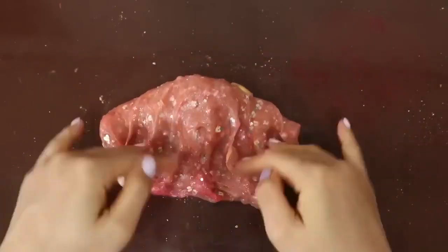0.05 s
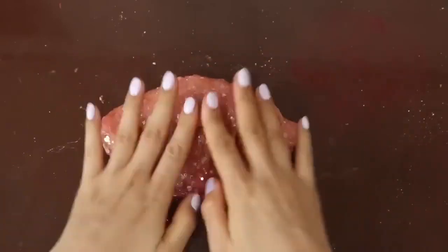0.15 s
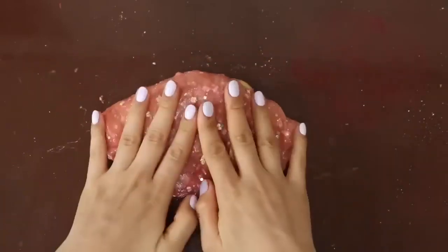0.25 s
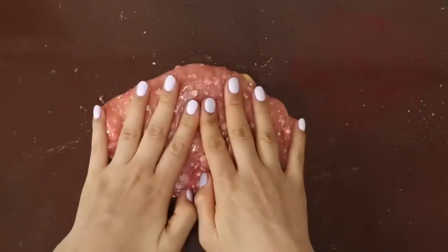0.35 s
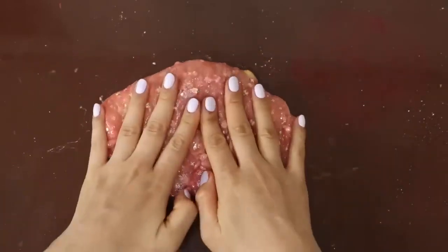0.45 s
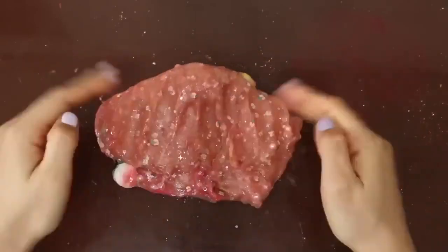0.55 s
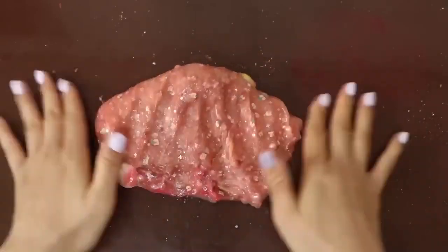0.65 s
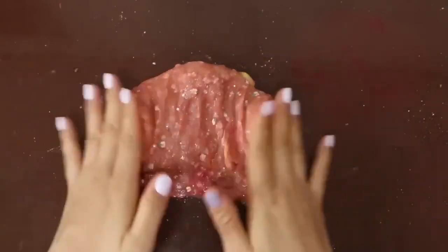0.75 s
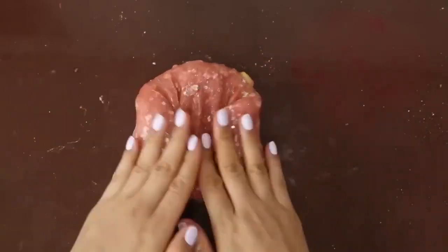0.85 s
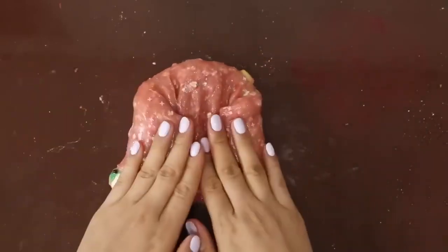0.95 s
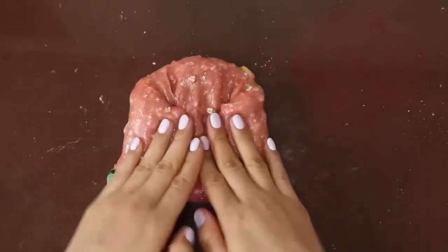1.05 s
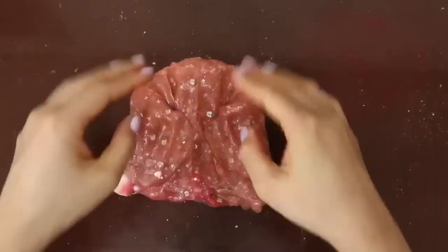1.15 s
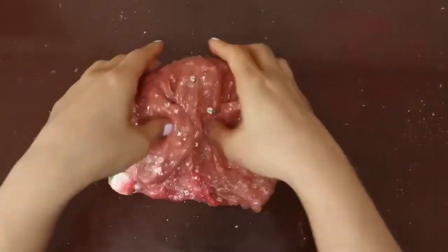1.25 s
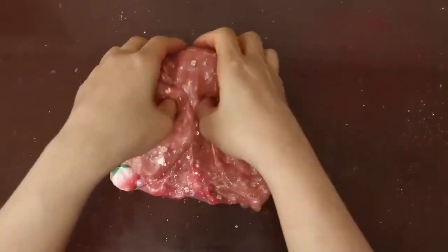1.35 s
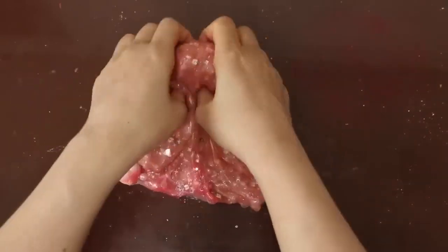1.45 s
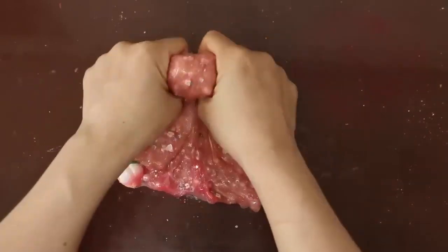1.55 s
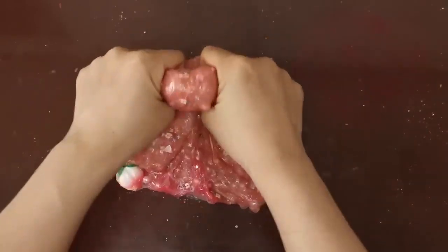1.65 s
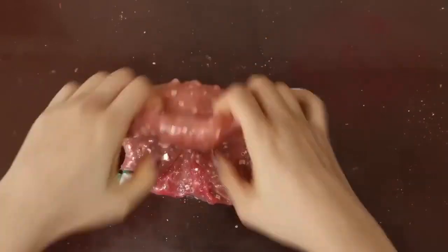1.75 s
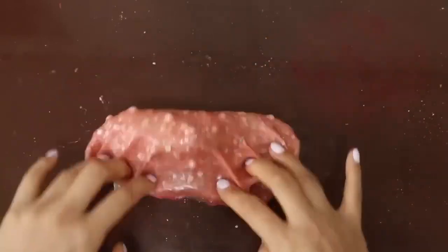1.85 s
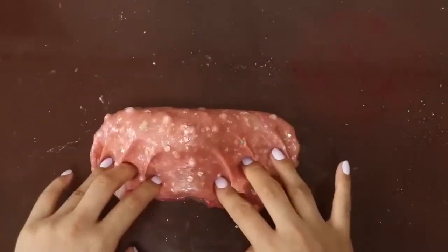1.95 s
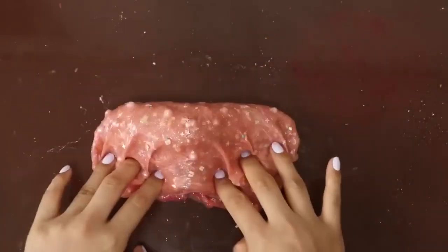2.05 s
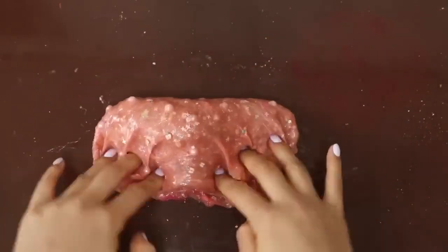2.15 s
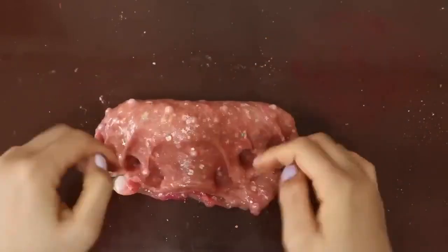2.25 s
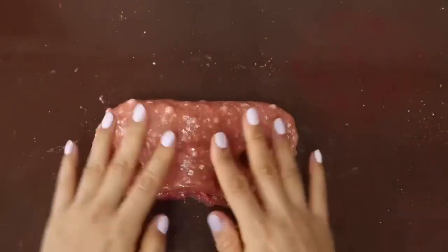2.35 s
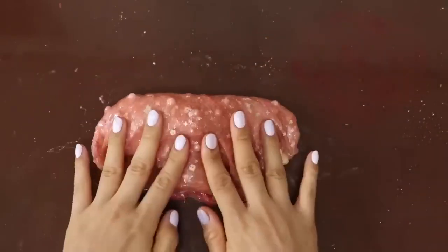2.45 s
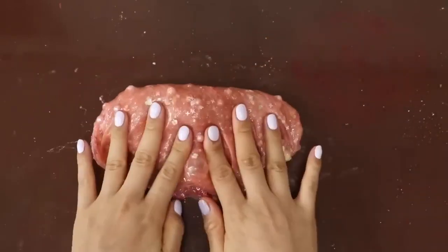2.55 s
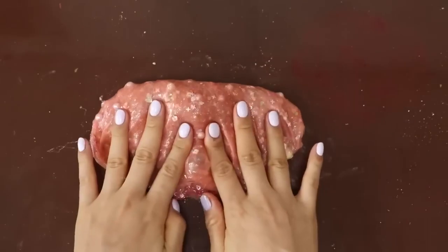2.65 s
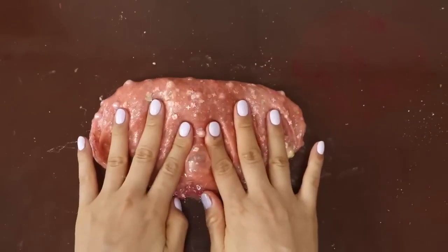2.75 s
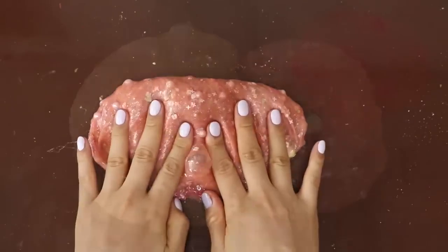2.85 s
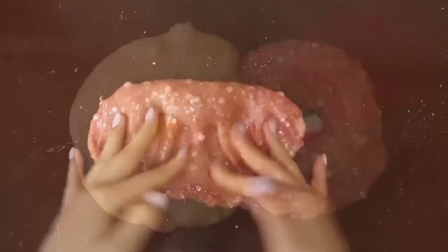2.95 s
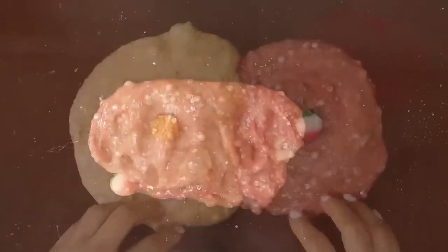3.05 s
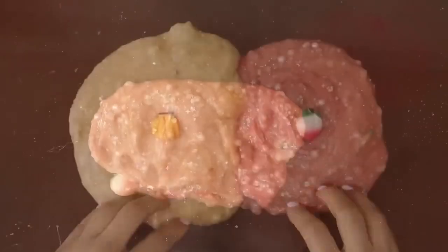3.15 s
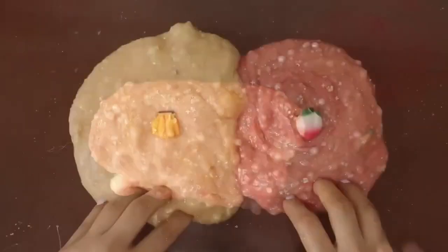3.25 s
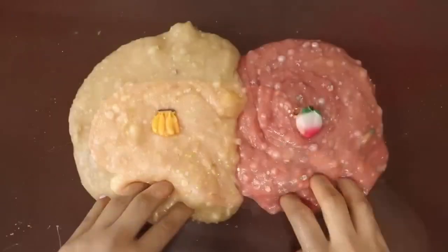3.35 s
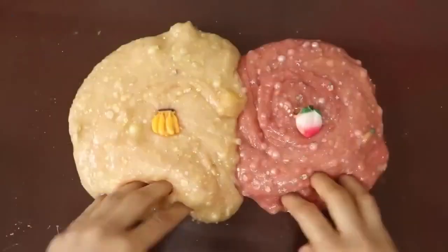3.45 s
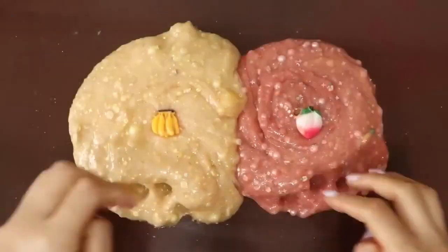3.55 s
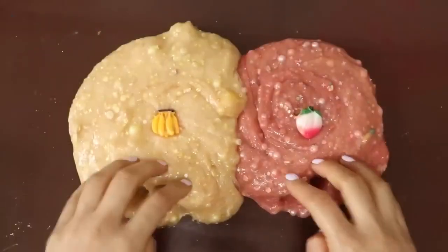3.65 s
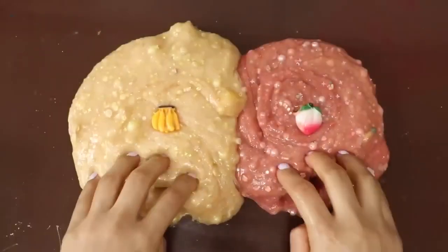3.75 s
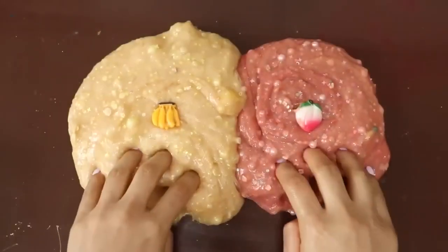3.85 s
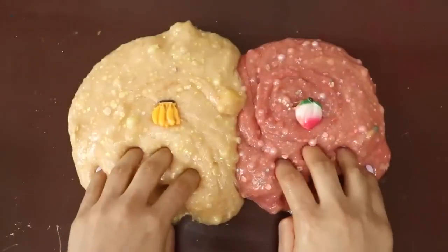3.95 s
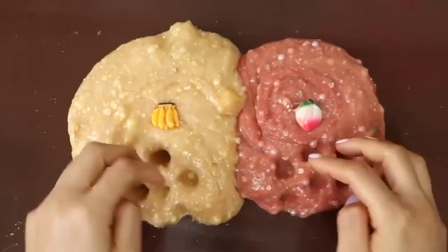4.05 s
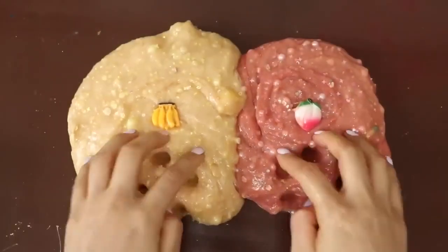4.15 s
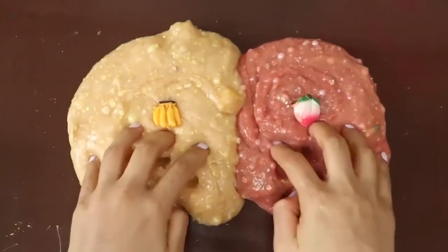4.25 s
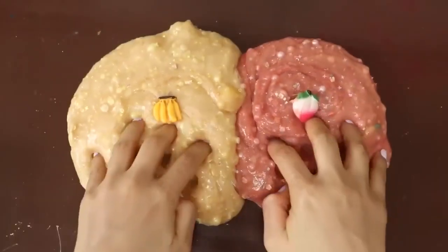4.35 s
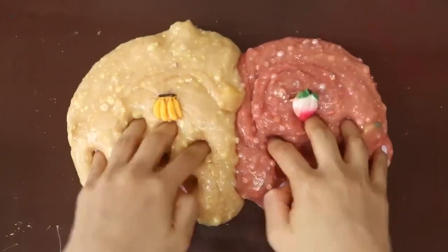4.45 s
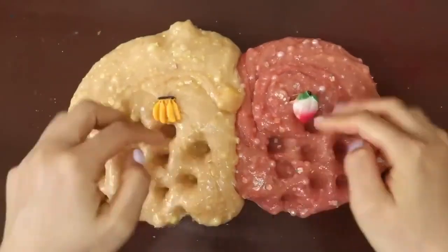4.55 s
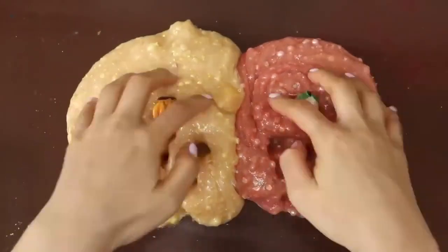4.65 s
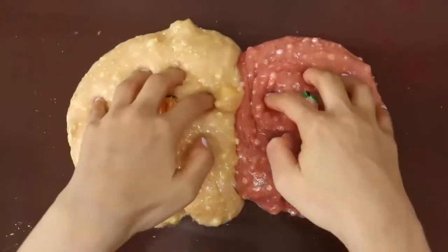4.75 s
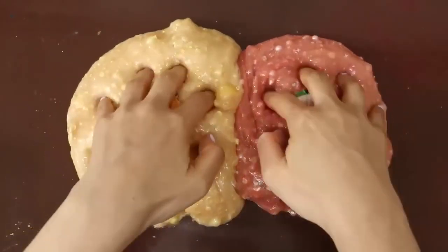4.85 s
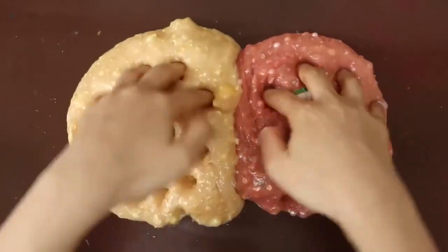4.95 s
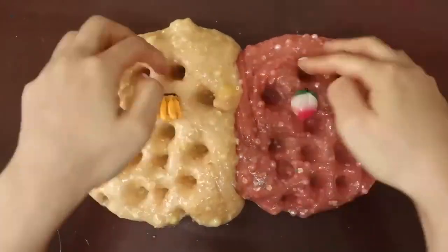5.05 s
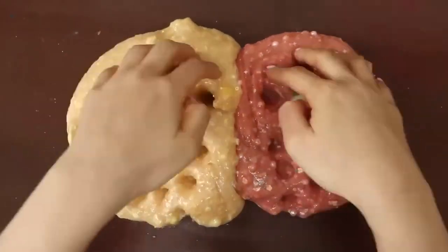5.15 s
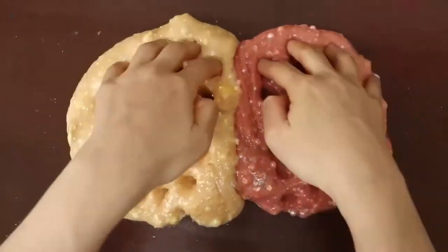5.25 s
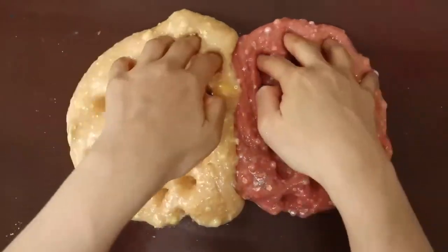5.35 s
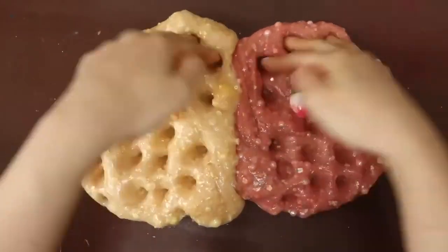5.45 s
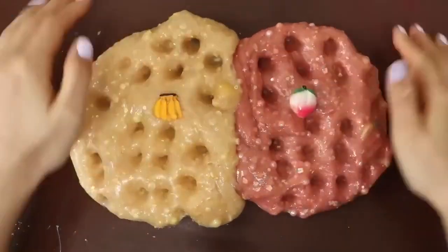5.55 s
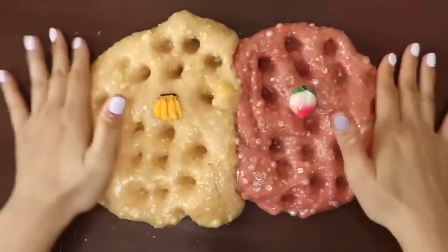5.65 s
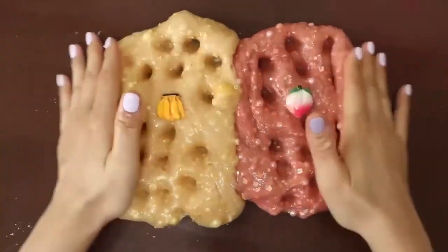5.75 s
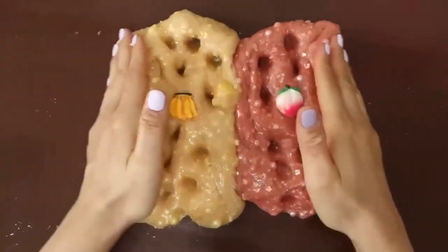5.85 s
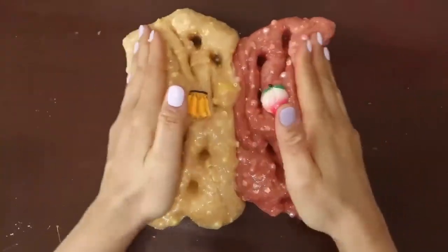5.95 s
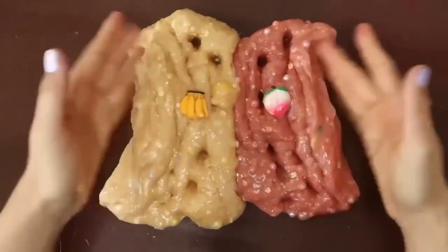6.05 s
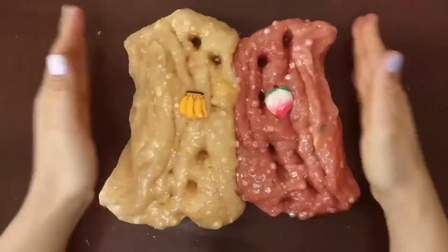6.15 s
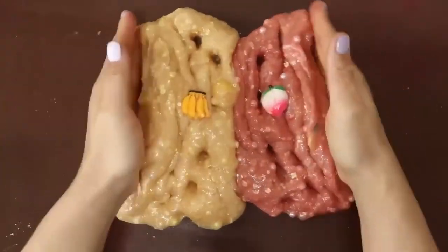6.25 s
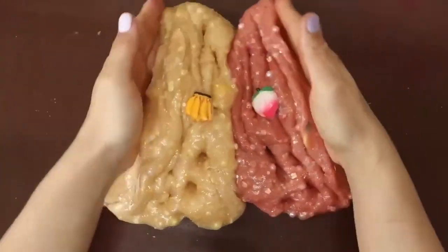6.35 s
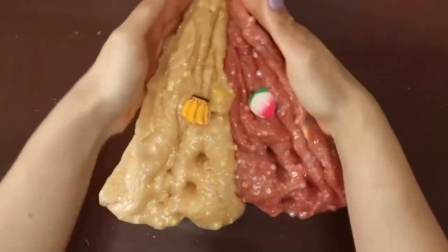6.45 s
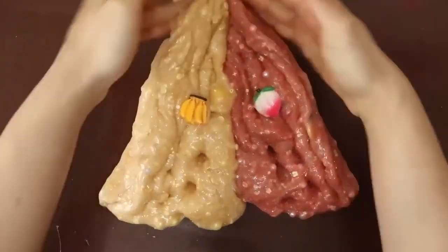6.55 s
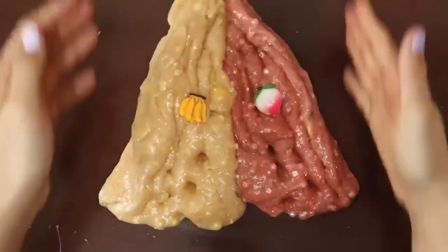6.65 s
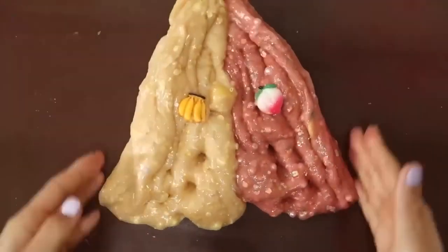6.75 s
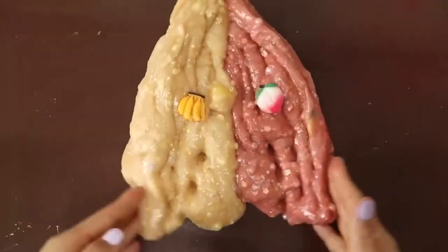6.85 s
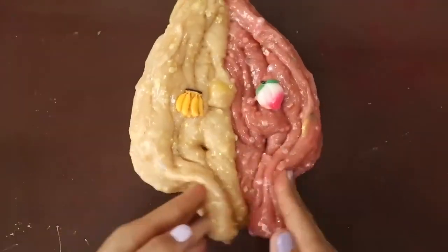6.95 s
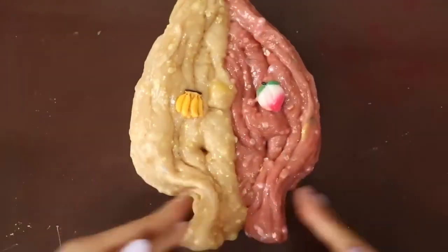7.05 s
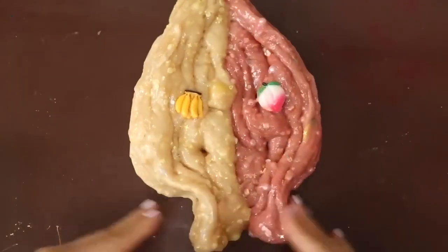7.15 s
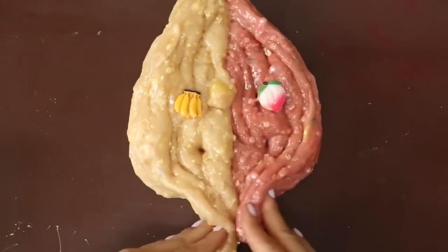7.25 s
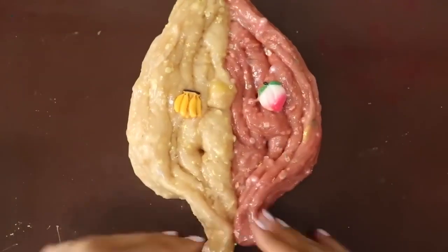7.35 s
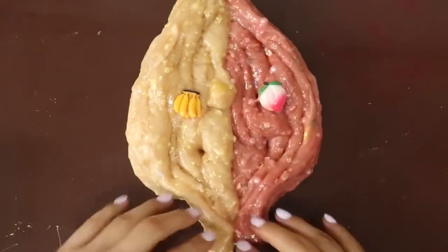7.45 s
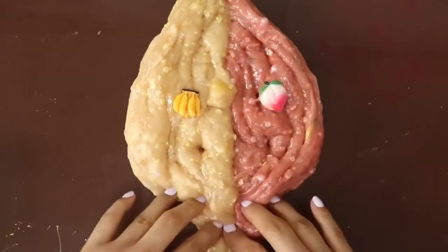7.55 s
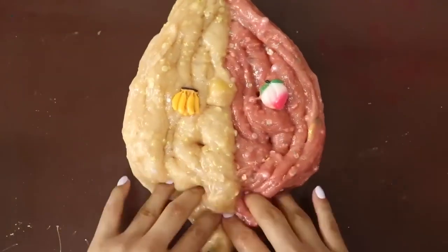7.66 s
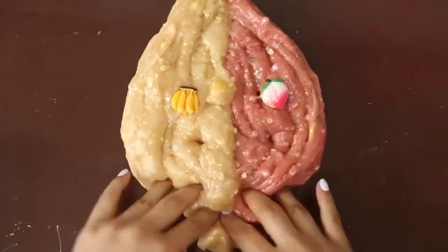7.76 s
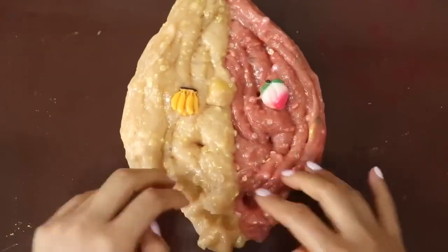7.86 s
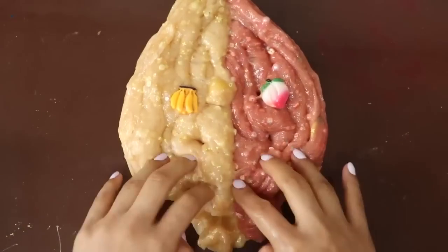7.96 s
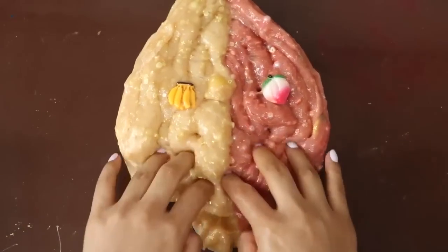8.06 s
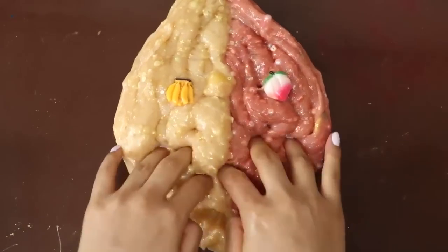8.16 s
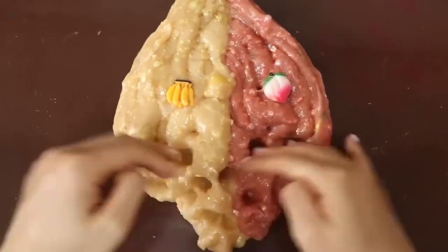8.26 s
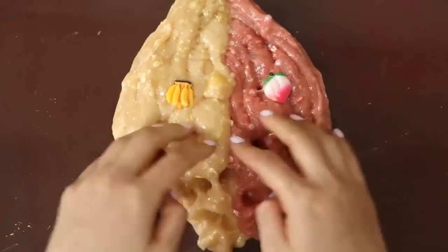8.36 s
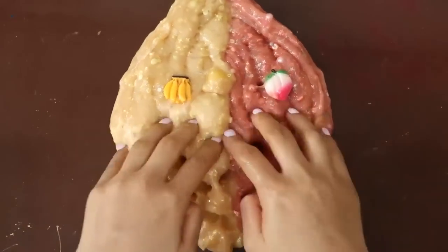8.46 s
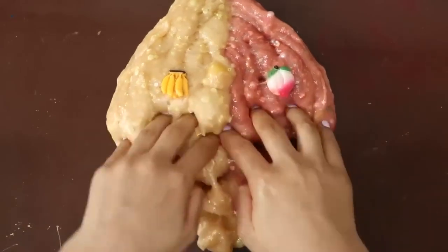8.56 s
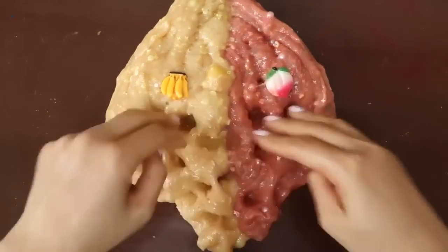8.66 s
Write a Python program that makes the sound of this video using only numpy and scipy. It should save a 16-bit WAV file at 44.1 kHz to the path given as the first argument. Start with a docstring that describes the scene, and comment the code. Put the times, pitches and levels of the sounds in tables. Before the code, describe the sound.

A quiet indoor room with a soft low hush and faint hum; a close stereo microphone hears hands working sticky slime on a wooden table. From 0 to 1.3 seconds, gentle wet presses with small dry snaps and a few pops. Between 1.4 and 1.8, stretching gives a cluster of bright cracks, two very loud near 1.65, then a sticky peel. From 2 to 3 it is calmer, with a soft squish at 2.3. Presses at 3.05 and 3.6 bring hollow pops. Strong pokes at about 4.1, 4.6, 5.1 and 5.5 make gulping squelches, loud crackling bubble bursts and low table booms with a slight sway. From 5.8 to 6.9, squeezing and stretching scatter crisp snaps, with thuds at 6.2 and 6.65. Quieter sticky handling follows, with wet presses at 7.9 and a juicier popping one at 8.3, then small ticks.

```python
"""On a light wooden table in a quiet room, hands knead and poke sticky slime close to a stereo microphone.
Air pockets burst with a crack of noise and a short hollow ring; sticky film snaps with dry cracks.
Peeling is hiss and random ticks, squelching is gulps that ring in small pockets, sliding fingers are soft noise.
Pushes make the table top boom, and it sways on its legs when the hands let go."""
import sys
import numpy as np
from scipy import signal
from scipy.io import wavfile

SR = 44100
rng = np.random.default_rng(int(sys.argv[2]) if len(sys.argv) > 2 else 0)


def level_to_linear(level):
    """Convert decibel levels to linear amplitude factors, elementwise."""
    exponent = np.asarray(level, float) / 20
    return 10 ** exponent


def transcribe(u):
    """Save the signal u as a 16-bit wav file named by the first command-line argument.

    u: samples, shape (n,) or (channels, n), limited to [-1, 1]; the rate is SR.
    q: integer samples, one column per channel.
    """
    v = np.clip(np.atleast_2d(u).T, -1, 1)
    q = np.round(v * 32767).astype(np.int16)
    wavfile.write(sys.argv[1], SR, q)


N = 384552   # length in samples


def rms_one(x):
    """Scales a sound to an rms of 1."""
    return x / np.sqrt(np.mean(x ** 2) + 1e-20)


def at_hz(points, hz):
    """Reads a curve of (pitch, value) points, with pitch on a logarithmic scale."""
    points_hz, values = np.array(points).T
    return np.interp(np.log(hz), np.log(points_hz), values)


def band(x, low_hz, high_hz, order=2):
    """Keeps the sound between two pitches."""
    edges_hz = [low_hz, min(high_hz, SR / 2.2)]
    return signal.sosfilt(signal.butter(order, edges_hz, "band", fs=SR, output="sos"), x)


def drift(rate):
    """Slow chance: random points of spread 1, so many a second, joined by straight lines."""
    knots = rng.standard_normal(int(N / SR * rate) + 2)
    return np.interp(np.arange(N) * rate / SR, np.arange(len(knots)), knots)


def ring(x, hz, t60):
    """A resonance: a unit click sets a sine of height 1 ringing, which falls 60 dB in t60 seconds."""
    radius = level_to_linear(-60 / (t60 * SR))
    turn = 2 * np.pi * hz / SR
    return signal.lfilter([0, np.sin(turn)], [1, -2 * radius * np.cos(turn), radius ** 2], x + 1e-18)


# how alike the two ears hear a sound: (frequency [Hz], left-right likeness [1 = the same, 0 = unrelated])
EAR_LIKENESS = [(60, 0.14), (300, 0.14), (700, 0.27), (3000, 1), (8000, 0.14)]


def spread(source, spectrum, lowest_hz):
    """Two unrelated signals become left and right, half an octave at a time, coloured by the spectrum; rms 1."""
    edges = lowest_hz * 2 ** np.arange(0, np.log2(18000 / lowest_hz), 0.5)
    out = 0
    for k, (low, high) in enumerate(zip(edges, edges[1:])):
        mid, side = band(source, low, high) * (-1) ** k   # every other band is turned upside down
        hz = np.sqrt(low * high)
        alike = np.clip(at_hz(EAR_LIKENESS, hz), -1, 1)
        ears = np.sqrt(1 + alike) * mid + np.sqrt(1 - alike) * side * [[1], [-1]]
        out = out + level_to_linear(at_hz(spectrum, hz)) * ears
    return rms_one(out)


def grains(per_s, spread_db, clump_db):
    """Clicks of sticky threads that snap at random, in clumps, with a long tail of sizes."""
    born = rng.random(N) < per_s * level_to_linear(clump_db * drift(60)) / SR
    size = level_to_linear(spread_db * np.minimum(rng.exponential(1, N), 4))
    return born * size * rng.choice([-1, 1], N)


def add(out, sound, s):
    """Places a short sound at a time, a little to one side or the other by chance."""
    i = round(s * SR)
    balance_db = np.array([[0.5], [-0.5]]) * rng.normal(1, 1.7)
    out[:, i:i + sound.shape[1]] += (sound * level_to_linear(balance_db))[:, :N - i]


def crack(noise, db, hz, tear_ms, width=1.5, body_db=-8, apart=0.32, body_apart=0.23, fizz_db=-26, fizz_s=0.0072):
    """Noise while the skin tears: it swells to a peak after tear_ms, closes more slowly and fizzes out."""
    t = np.arange(noise.shape[1]) / SR
    late = 1000 * t / tear_ms - 1   # from the peak, in tear times
    burst = np.exp(-np.where(late < 0, 2 * late, late / 2) ** 2)
    tearing = burst + level_to_linear(fizz_db) * np.exp(-t / fizz_s)
    mid = noise[0] * tearing
    side = noise[1] * tearing * [[1], [-1]]
    half_width = 2 ** (width / 2)   # width is in octaves
    out = band(mid + apart * side, hz / half_width, hz * half_width, order=1)
    out = out + level_to_linear(body_db) * band(mid + body_apart * side, 590, 16000, order=1)
    return out * level_to_linear(db) / np.abs(out.mean(axis=0)).max()


# colour of the quiet room and the microphone's own noise: (frequency [Hz], relative level [dB per Hz])
HUSH_COLOUR = [(15, -30), (25, 4.5), (50, 4.5), (134, -2), (293, -10.5), (344, -14), (394, -22), (516, -19),
               (863, -25), (3340, -35), (7710, -39), (10700, -40.5), (16000, -40.5)]
# faint wavering tones in the room: (frequency [Hz], rms level [dB])
HUM_TONES = [(346, -71.5), (517, -72.5)]


def hush(rms_db=-50.5):
    """Steady coloured noise, with two faint tones made by narrow resonances in noise."""
    out = level_to_linear(rms_db) * spread(rng.standard_normal((2, N)), HUSH_COLOUR, 22)
    for hz, db in HUM_TONES:
        out = out + level_to_linear(db) * rms_one(ring(rng.standard_normal((2, N)), hz, 0.33))
    return out


def room(x, t60_s=0.16, tail_db=-15):
    """Echoes from all around: a short tail of fading noise, unrelated in the two ears."""
    t = np.arange(SR // 4) / SR
    tail = rng.standard_normal((2, len(t))) * level_to_linear(-60 * t / t60_s) * (1 - np.exp(-t / 0.0015))
    tail = tail / np.sqrt(np.sum(tail[0] ** 2))
    return level_to_linear(tail_db) * signal.fftconvolve(x, tail, axes=1)[:, :N]


# the table let go: (time [s], slow sway level [dB], quick sway level [dB])
RELEASES = [(0.16, -32.5, -53), (0.285, -40, -32.5), (0.61, -34.5, -33.5), (0.759, -47.5, -37),
            (0.858, -44.5, -39.5), (1.222, -35, -40), (1.827, -25, -32.5), (2.305, -32.5, -44),
            (3.049, -32, -47), (3.594, -35, -44), (4.137, -26.5, -32.5), (4.635, -22, -38),
            (5.112, -22.5, -31.5), (5.577, -24.5, -32.5), (5.738, -43, -33), (6.197, -23.5, -25),
            (6.662, -22, -30), (7.178, -29.5, -71), (7.445, -29.5, -41), (7.898, -23.5, -30.5),
            (7.997, -56, -36.5), (8.347, -31, -28.5)]
# the slow and the quick sway on the legs:
# (usual frequency [Hz], time to fall 60 dB [s], part opposed in the ears, against the part alike [dB])
LEG_MODES = [(27.97, 0.63, -2.5), (52, 0.57, 0.5)]


def sway():
    """Each release is a soft shove that sets both leg modes swinging, a little off their pitch each time."""
    out = np.zeros((2, N))
    chance = rng.standard_normal((len(RELEASES), 2, 2))
    for (s, *levels_db), luck in zip(RELEASES, chance):
        i = round(s * SR)
        t = np.arange(min(SR, N - i)) / SR
        for (hz, t60, opposed_db), db, (off, lag) in zip(LEG_MODES, levels_db, luck):
            swing = level_to_linear(db - 60 * t / t60) * (1 - np.exp(-t / 0.009))
            turn = 2 * np.pi * hz * (1 + 0.063 * off) * t
            opposed = level_to_linear(opposed_db) * np.sin(turn + 2 * lag) * [[1], [-1]]
            out[:, i:i + len(t)] += swing * (np.sin(turn) + opposed)
    return out


# short presses and pull-offs; the levels are drives, before each sound's own trim:
# (time of full strength [s], rise [s], peeling hiss [dB], wet low squelch [dB], push on the table top [dB])
SHORT_PRESSES = [(0.116, 0.076, -45.5, -45, -53.5), (0.279, 0.014, -54, -55, -42),
                 (0.596, 0.041, -40, -39, -47), (0.751, 0.0063, -51, -60, -33.5),
                 (0.882, 0.03, -57.5, -53.5, -67), (1.187, 0.028, -44.5, -41, -50),
                 (1.832, 0.066, -36.5, -41.5, -51), (2.301, 0.045, -42, -39.5, -35.5),
                 (3.041, 0.036, -40.5, -39, -39.5), (3.584, 0.043, -38, -35, -38),
                 (4.122, 0.045, -32.5, -28.5, -33), (4.593, 0.017, -26.5, -26.5, -29.5),
                 (5.097, 0.053, -28, -28, -34), (5.352, 0.019, -65, -59.5, -47.5),
                 (5.537, 0.019, -29.5, -29.5, -31), (5.703, 0.026, -57, -56, -31.5),
                 (5.866, 0.039, -46.5, -50.5, -64), (6.146, 0.061, -37.5, -39.5, -39),
                 (6.64, 0.025, -34, -37, -39.5), (7.131, 0.027, -50.5, -45.5, -46.5),
                 (7.323, 0.015, -57.5, -51, -43.5), (7.423, 0.025, -52, -49, -42.5),
                 (7.883, 0.027, -36.5, -39, -35), (8.313, 0.0054, -32, -24, -28),
                 (8.711, 0.0195, -48.5, -45, -70)]
# slow stretching and squeezing, likewise: (time of full strength [s], rise [s], hold [s], peeling hiss [dB])
SLOW_STRETCHES = [(0.806, 0.08, 0.044, -47), (1.492, 0.23, 0.24, -50), (1.795, 0.059, .04, -36),
                  (1.875, 0.025, 0.079, -52), (3.106, 0.029, 0.08, -64.5), (5.307, 0.0724, 0.16, -67),
                  (5.791, 0.18, 0.1, -53), (5.947, 0.029, 0.12, -53.5), (6.305, 0.012, 0.046, -55.5),
                  (6.365, 0.023, 0.21, -47), (6.909, 0.035, 0.13, -50.5)]


def effort(fall_db_per_s=450, swell_db=28, press_hold_s=0.015):
    """Every press or stretch swells, holds and lets go; gives the gains of hiss, squelch and push."""
    kneads = [(s, rise, press_hold_s, *levels_db) for s, rise, *levels_db in SHORT_PRESSES]
    # in a stretch, squelch and push lie below the hiss
    kneads += [(s, rise, hold, db, db - 4, db - 6.5) for s, rise, hold, db in SLOW_STRETCHES]
    t = np.arange(0, N, 32) / SR
    power = 0
    for s, rise, hold, *levels_db in kneads:
        swell = np.minimum(swell_db * (t - s) / rise, 0)
        fall = fall_db_per_s * np.maximum(t - s - hold, 0)
        gains_db = np.add.outer(levels_db, swell - fall)
        power = power + level_to_linear(np.maximum(gains_db, -150)) ** 2
    return [np.interp(np.arange(N) / SR, t, np.sqrt(p)) for p in power]


# resonances of the table top:
# (frequency [Hz], relative level alike in both ears [dB], relative level opposed [dB], time to fall 60 dB [s])
TOP_MODES = [(101, -15.5, -5, 0.17), (141.7, -6, 5.5, 0.43), (200.5, 1.5, -11, 0.058), (244, -4, -8, 0.1),
             (273, -8, 0.5, 0.081)]


def table_top(gain):
    """Lumpy pushes drive the panel modes; some reach the two ears in opposition."""
    lumpy = gain * rng.standard_normal((2, N)) * level_to_linear(4.0 * drift(40))
    push = band(lumpy, 67, 280)   # flesh lands softly
    out = 0
    for hz, alike_db, opposed_db, t60 in TOP_MODES:
        mid, side = ring(push, hz, t60) / np.sqrt(t60 * SR)
        out = out + level_to_linear(alike_db) * mid + level_to_linear(opposed_db) * side * [[1], [-1]]
    return level_to_linear(12.0) * out


# fingers slide lightly: (start time [s], length [s], level before its flutter [dB])
FINGER_RUBS = [(1.92, 0.053, -57.5), (3.093, .1, -68.5), (3.705, 0.28, -69), (4.672, .33, -74),
               (7.473, 0.33, -69.5)]


def rubbing(centre_hz=2800, octaves=0.7, fade_s=0.03):
    """A soft band of friction noise that flutters, and fades in and out with each slide."""
    t = np.arange(N) / SR
    gain = 0
    for s, length, db in FINGER_RUBS:
        gain = gain + level_to_linear(db) * np.clip(np.minimum(t - s, s + length - t) / fade_s + 0.5, 0, 1)
    half_width = 2 ** (octaves / 2)
    mid, side = band(rng.standard_normal((2, N)), centre_hz / half_width, centre_hz * half_width)
    return gain * level_to_linear(4.7 * drift(80)) * rms_one(mid + 0.38 * side * [[1], [-1]])


# hollows that the fingers leave in the slime: (time [s], relative level [dB], resonances [Hz] ..)
FINGER_HOLLOWS = [(0.894, 4, 1200), (3, -0.5, 730, 2002, 3723), (3.62, 3.3, 950),
                  (3.5, -2, 819, 1369.5, 2995), (4.5, -5.5, 1034, 2029.5, 3068),
                  (5, -1.5, 1004, 1902, 3198), (6.95, -6.5, 1100), (7.14, -10, 1050),
                  (7.89, -7.5, 513, 850, 1325)]


def squelch(gain, apart=0.7):
    """Gulps ring briefly in small pockets of every size, and longer in the hollow that a finger has just left."""
    gulps = rms_one(grains(700, spread_db=4.0, clump_db=5.0))
    mid = gulps + 0.7 * rng.standard_normal(N)
    side = rng.standard_normal(N)
    source = gain * (mid + apart * side * [[1], [-1]])
    dealt = rng.integers(0, 9, N)   # each sample goes to one pocket size
    out = 0
    for k, hz in enumerate(np.geomspace(560, 3000, 9)):
        t60 = 9 / hz
        pocket = ring(source * (dealt == k), hz, t60) * 4 / np.sqrt(t60 * SR)
        out = out + pocket * (450 / hz) ** 0.5   # weaker when higher
    for s, db, *modes in FINGER_HOLLOWS:
        near = slice(round((s - 0.04) * SR), round((s + 0.12) * SR))
        opening = np.minimum(np.arange(near.stop - near.start) / (0.03 * SR), 1)
        for k, hz in enumerate(modes):
            t60 = 12 * (1 + k / 2) / hz
            out[:, near] += level_to_linear(db) * ring(source[:, near] * opening, hz, t60) * 3 / np.sqrt(t60 * SR)
    return level_to_linear(2.5) * out * level_to_linear([[0.5], [-0.5]])   # slightly louder on the left


# colour of the peeling: (frequency [Hz], relative level [dB per Hz])
PEEL_COLOUR = [(880, -32), (1500, -13.5), (2460, -15.5), (3730, -8), (7320, -10), (11100, -4.5),
               (16000, -10)]


def peeling(hiss, creep_db=-73):
    """Wet hiss flares in patches of pitch and sticky threads part, each in its own colour; idle slime still ticks."""
    ticks = 1.5 * hiss * rms_one(grains(800, spread_db=4.3, clump_db=6.0))
    # creep_db is set before the colouring and the trim below
    ticks = ticks + level_to_linear(creep_db) * rms_one(grains(22, spread_db=4.5, clump_db=7.0))
    dealt = rng.integers(0, 10, N)   # the colour of each tick
    white = rng.standard_normal((2, 2, N))
    near, wet = 0, 0
    for k, hz in enumerate(np.geomspace(1500, 15000, 10)):
        near = near + band(ticks * (dealt == k) + 1e-18, hz / 1.35, hz * 1.35) * np.sqrt(SR / hz)
        wet = wet + band(white[k % 2], hz / 1.14, hz * 1.14) * level_to_linear(5.5 * drift(120))
    # the two ears hear each tick smeared differently
    smear = signal.lfilter(rms_one(rng.standard_normal(16)) / 4, [1], near)
    source = np.array([near, smear]) + wet * level_to_linear(4.7 * drift(90) + 1.0) * hiss
    strength = np.sqrt(np.mean(source ** 2))
    return level_to_linear(-4.5) * strength * spread(source, PEEL_COLOUR, 1400)


# sticky film snapping off skin or table, with no pocket behind it; peaks are before the chance balance:
# (time [s], peak level [dB], centre frequency [Hz])
FILM_SNAPS = [(0.3014, -24, 9500), (0.3629, -22.5, 5150), (0.4407, -26.5, 6060), (0.5185, -18.5, 9250),
              (0.7967, -43, 5960), (0.8066, -21, 9800), (0.819, -25, 9000), (0.9049, -31, 11800),
              (1.0323, -28, 9700), (1.3855, -31.5, 4530), (1.432, -9.5, 11400), (1.5529, -19.5, 4040),
              (1.617, -14.5, 8300), (1.6312, -21.5, 6500), (1.6445, 0.5, 5660), (1.651, 3.5, 9100),
              (1.6653, -15, 5700), (1.6706, -9, 9500), (1.701, -24, 3500), (1.7112, -9.5, 14600),
              (1.804, -9, 10000), (2.168, -39, 3970), (2.2448, -35.5, 3500), (2.7068, -26, 7040),
              (2.824, -36.5, 5000), (2.879, -50, 5000), (3.471, -48, 6000), (3.4899, -30, 10600),
              (3.9825, -35.5, 10160), (4.3694, -36, 6700), (4.945, -31, 5100), (5.332, -31.5, 6080),
              (5.359, -29.5, 11000), (5.424, -38.5, 2990), (5.83, -15.5, 11600), (5.966, -30, 11500),
              (6.0789, -19.5, 10000), (6.1835, -19, 7000), (6.309, -25, 5230), (6.3682, -24, 9600),
              (6.408, -23, 10000), (6.4883, -17.5, 13300), (6.555, -15.5, 10100), (6.6752, -13, 9300),
              (6.7749, -17.5, 4550), (6.7799, -20.5, 3770), (6.8952, -23.5, 10370), (7.318, -32.5, 11450),
              (7.33, -26.5, 3276), (7.641, -36, 4000), (7.697, -35, 6030), (7.711, -40, 6000),
              (8.0513, -32, 4790), (8.1994, -30.5, 4740), (8.611, -28, 10450), (8.7107, -23.5, 6630)]


def snaps(tear_ms=0.31):
    """Short dry cracks of noise as the film tears."""
    out = np.zeros((2, N))
    for s, db, hz in FILM_SNAPS:
        add(out, crack(rng.standard_normal((2, 2048)), db, hz, tear_ms), s - tear_ms / 1000)
    return out


# bursting air pockets; levels are before the chance balance:
# (time [s], crack peak level [dB], crack centre [Hz], pocket ring level [dB], pocket starting pitch [Hz])
BURSTS = [(0.3734, -11.5, 9900, -35, 2290), (0.8144, -29.5, 5000, -35, 2000),
          (1.5667, -10.5, 5300, -28, 1400), (1.723, -20, 6500, -34, 2490), (1.7391, -19.5, 4260, -33, 2550),
          (1.7927, -15.5, 10830, -25.5, 1360), (2.309, -32, 3500, -25.5, 900),
          (3.0455, -29.5, 3000, -20.5, 680), (3.058, -26.5, 3700, -20, 3700),
          (3.582, -9, 7400, -15.5, 1800), (3.5994, -18, 4220, -11.5, 950),
          (4.086, -1.5, 10110, -16.5, 1000), (4.107, -8, 7670, -14, 623), (4.1151, -21.5, 5950, -13, 1350),
          (4.1348, -17.5, 4000, -15, 3600), (4.5781, -20, 8580, -30, 510), (4.593, -15, 9620, -16.5, 1550),
          (4.597, -6.5, 4916, -15.5, 1340), (5.0579, -2, 7360, -4.5, 980), (5.0796, 2, 9750, -4.5, 790),
          (5.1049, -9, 5790, -12.5, 880), (5.1074, -2, 4306, -4.5, 1120), (5.5326, 0.5, 8540, -2.5, 1474),
          (5.5474, 2.5, 9650, -9.5, 1380), (5.5713, -5.5, 8940, -16.5, 1370),
          (6.3767, -9, 6300, -19.5, 1350), (6.5261, -6.5, 11400, -23, 1530),
          (6.567, -6.5, 3150, -21.5, 540), (6.5798, -21, 8900, -29, 1060), (6.8325, -18.5, 6900, -35, 2000),
          (7.8844, -25.5, 6300, -22.5, 800), (8.312, -8.5, 9000, -9.5, 1230),
          (8.3267, -14, 6300, -15.5, 512)]


def pops(cycles=8.4, equal_tear_ms=1.05, tear_follows=0.6):
    """After the crack the open pocket rings a few cycles, rising as its mouth widens."""
    out = np.zeros((2, N))
    for s, crack_db, crack_hz, ring_db, pocket_hz in BURSTS:
        # equal_tear_ms holds for a ring as loud as its crack; weaker rings mean thinner skins that tear faster
        tear_ms = equal_tear_ms * level_to_linear(tear_follows * (ring_db - crack_db))
        opened = np.maximum(np.arange(2048) / SR - 1.8 * tear_ms / 1000, 0)   # seconds
        phase = 2 * np.pi * pocket_hz * opened * (1 + 25 * opened)
        decay = level_to_linear(ring_db + 3.5 - 60 * opened * pocket_hz / cycles)   # 60 dB in so many cycles
        onset = 1 - np.exp(-opened * pocket_hz / 0.28)
        hollow = -np.sin(phase) * decay * onset
        burst = crack(rng.standard_normal((2, 2048)), crack_db, crack_hz, tear_ms)
        add(out, burst + hollow, s - tear_ms / 1000)
    return out


def scene():
    """The slime and its echoes, the table under it and the quiet room, added together."""
    hiss, wet, push = effort()
    slime = pops() + snaps() + peeling(hiss) + squelch(wet) + rubbing()
    return slime + room(slime) + table_top(push) + sway() + hush()


def roll_off(x):
    """The treble ends steeply here."""
    return signal.sosfilt(signal.butter(12, 16990, fs=SR, output="sos"), x)


def record(dry):
    """The loudest cracks touch full scale and are clipped; the very top is cut."""
    clipped = np.clip(dry, -1, 1)
    top_cut = signal.cheby2(10, 60, 17000, fs=SR, output="sos")   # 60 dB down from 17 kHz up
    mix = signal.sosfilt(top_cut, clipped)
    return roll_off(mix)


dry = scene()
out = record(dry)
transcribe(out)
```